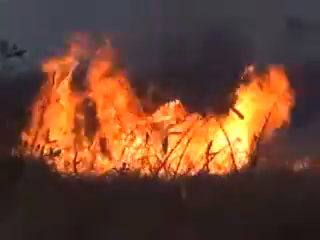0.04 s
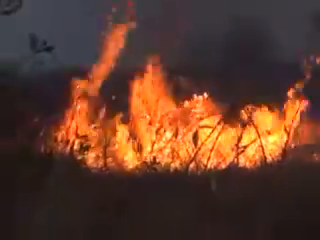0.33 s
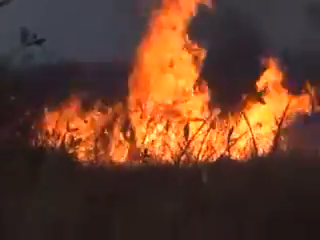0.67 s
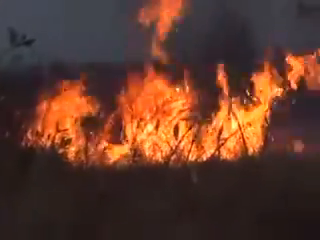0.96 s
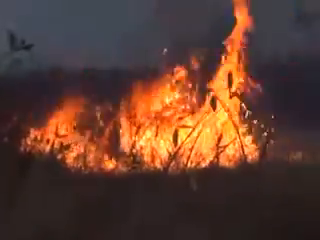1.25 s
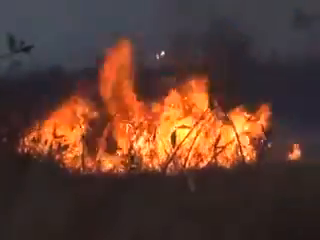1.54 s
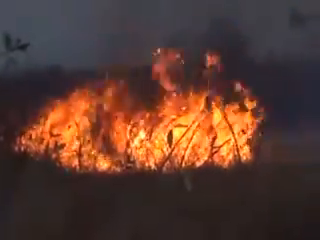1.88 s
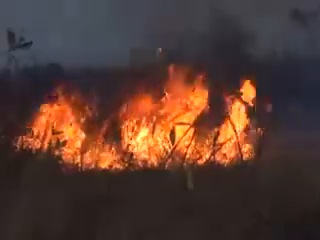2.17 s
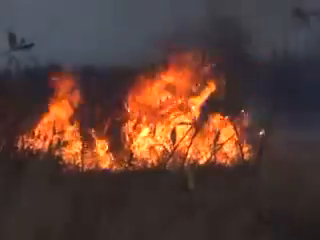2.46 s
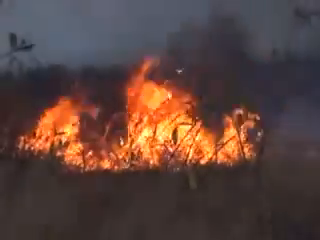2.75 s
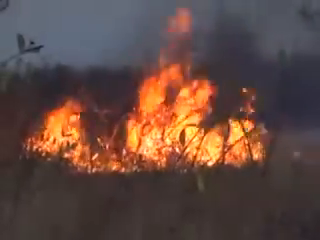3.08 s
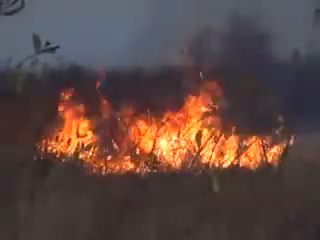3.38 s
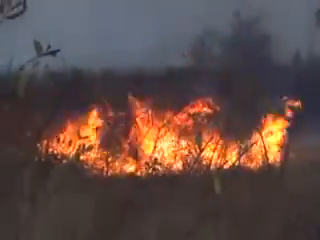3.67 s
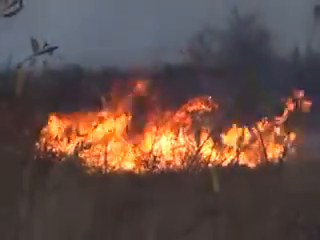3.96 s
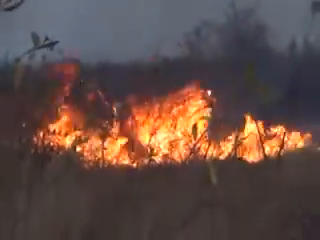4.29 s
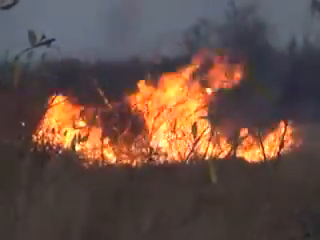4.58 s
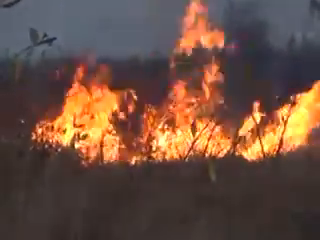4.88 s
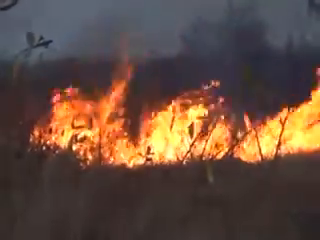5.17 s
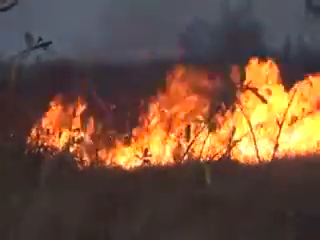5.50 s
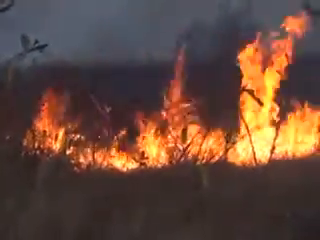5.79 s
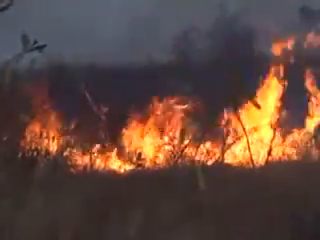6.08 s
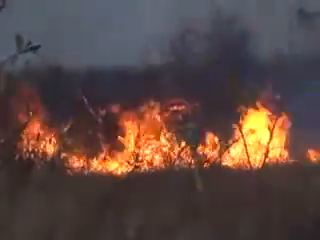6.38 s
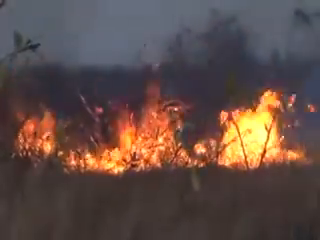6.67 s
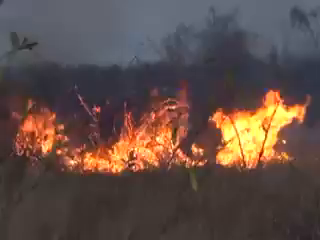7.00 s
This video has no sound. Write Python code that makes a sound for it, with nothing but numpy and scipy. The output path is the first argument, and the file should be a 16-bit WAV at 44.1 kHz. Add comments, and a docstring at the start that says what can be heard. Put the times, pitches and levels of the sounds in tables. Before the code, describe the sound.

Dry grass burns with a dense, bright crackle and sharp snaps over a low, fluttering roar of flames.

```python
"""A grass fire burns through dry brush in an open field, a few metres away and a little to the left.
Each bursting stalk radiates a pressure impulse and a decaying spray of noise from its tearing fibres.
Thousands superpose into a bright crackle; near ones snap, thick ones pop dully, hollow ones resonate.
Beneath them turbulent flames flutter and flare into a low, lumpy roar, and gas pockets ignite in whumps.
With no walls to reflect the sound, there is no reverberation."""
import sys
import numpy as np
from scipy import signal
from scipy.fft import rfft, irfft, next_fast_len
from scipy.io import wavfile
from scipy.ndimage import uniform_filter1d

SR = 44100
rng = np.random.default_rng(int(sys.argv[2]) if len(sys.argv) > 2 else 0)


def dump_mix(stems):
    """Bounce the given channels to the path in sys.argv[1] as a 16-bit WAV at rate SR."""
    frames = np.atleast_2d(stems).T  # one column per channel
    limited = np.clip(frames, -1, 1)  # hard clip at full scale
    pcm = np.round(limited * 32767).astype(np.int16)
    wavfile.write(sys.argv[1], SR, pcm)


N = 314874

# how hard the grass burns, used relative to its mean: t/s, thick-stalk level/dB, fine-blade level/dB
BURN_LEVELS = [(0.0, -37, -33), (1.31, -36, -34.5), (1.43, -37.5, -35), (1.87, -37, -35),
               (2.24, -37, -34.5), (2.42, -38, -36), (2.82, -37, -36), (3.42, -36.5, -33.5),
               (3.84, -38, -35.5), (4.2, -36, -34), (4.63, -36.5, -37), (4.81, -36, -36.5),
               (5.11, -36, -33), (5.47, -36, -32), (5.81, -36.5, -33), (6.04, -38, -34.5),
               (6.52, -38.5, -36.5), (7.14, -37.5, -36.5)]
# spectral envelope of ticks and snaps: f/Hz, gain/dB
SNAP_SPECTRUM = [(200, 21), (1000, -1), (2600, -0.5), (7000, -4), (10300, 0), (12500, -7), (15500, -22)]
STALK_HZ, BLADE_HZ = 2970, 8950   # where the two kinds of fuel sound
OPPOSITE = np.array([[1], [-1]])   # plus on the left, minus on the right


def from_db(db):
    """Amplitude ratio: a factor of ten for every 20 dB."""
    return 10 ** (np.asarray(db) / 20)


def unit_rms(x):
    """Normalisation to a mean square of one."""
    return x / np.sqrt(np.mean(x ** 2) + 1e-20)


def in_time(rows):
    """Linear interpolation of each column to every sample."""
    times, *columns = np.transpose(rows)
    return [np.interp(np.arange(N) / SR, times, column) for column in columns]


def at_hz(points, hz):
    """Interpolation on a logarithmic frequency axis."""
    known_hz, values = np.transpose(points)
    return np.interp(np.log(hz + 1e-9), np.log(known_hz), values)


def drift(corner_hz, step=40):
    """Random modulation of unit RMS: noise through two one-pole low-passes."""
    pole = np.exp(-2 * np.pi * corner_hz * step / SR)
    noise = rng.standard_normal(N // step + 2002)
    slow = signal.lfilter([1], [1, -2 * pole, pole ** 2], noise)[2000:]   # once settled
    return np.interp(np.arange(N) / step, np.arange(len(slow)), unit_rms(slow))


def coloured(x, spectrum, depth=1):
    """Minimum-phase filtering is causal: nothing sounds before its excitation."""
    size = 2 * next_fast_len(N // 2 + SR // 10)
    gain = from_db(depth * at_hz(spectrum, np.fft.rfftfreq(size, 1 / SR)))
    cepstrum = irfft(np.log(gain))
    cepstrum[1:size // 2] *= 2
    cepstrum[size // 2 + 1:] = 0
    return irfft(rfft(x, size) * np.exp(rfft(cepstrum)))[..., :N]


def resonance(x, hz, octaves, order=2):
    """A damped resonance as a band-pass: the wider the band, the shorter the ring."""
    low, high = hz * 2 ** (-octaves / 2), hz * 2 ** (octaves / 2)
    edges = [min(low, .4 * SR), min(high, .47 * SR)]
    return signal.sosfilt(signal.butter(order, edges, "band", fs=SR, output="sos"), x + 1e-18)


def stereo_noise(correlation, size=N):
    """Partial coherence: white noise with an in-phase and an antiphase part."""
    mid, side = rng.standard_normal((2, size))
    return np.sqrt((1 + correlation) / 2) * mid + np.sqrt((1 - correlation) / 2) * side * OPPOSITE


def tuft_swell_db(hz, spread_octaves=1.56):
    """A catching tuft raises the crackle's level by a Gaussian in time and log frequency."""
    # tufts catching: peak t/s, half-length/s, rise/dB, f/Hz
    tufts = [(0.708, 0.039, 2.5, 9000), (1.275, 0.032, 4, 5000), (1.893, 0.035, 3, 4000),
             (2.118, 0.046, 3, 6000), (3.277, 0.033, 2, 3000), (3.61, 0.021, 2, 2500),
             (3.953, 0.019, 7, 1600), (4.027, 0.017, 4.5, 7000), (4.254, 0.09, 3, 1630),
             (6.55, 0.02, 5, 3500)]
    t = np.arange(0, N, 200) / SR
    swell = sum(rise_db * np.exp(-((t - s) / half_s) ** 2 - (np.log2(hz / tuft_hz) / spread_octaves) ** 2)
                for s, half_s, rise_db, tuft_hz in tufts)
    return np.interp(np.arange(N) / SR, t, swell)


def crackle(level_db=-31.5, spray_share=0.7, spray_s=0.0011, hiss_db=-15, bands=16):
    """Shot noise: thousands of tiny bursts a second, most faint and a few strong, arrive in flurries."""
    # spectral envelope of the crackle: f/Hz, gain/dB
    spectrum = [(200, -3), (450, -7.5), (780, -10), (1000, -8.5), (1800, -4.5), (2700, -1.34),
                (3700, -0.65), (5200, -2), (7100, -2.5), (10300, -2.5), (12200, -8), (14300, -16),
                (15500, -27)]
    # coherence of sound scattered by the grass: f/Hz, left-right correlation
    coherence = [(600, 0.62), (1300, 1), (3000, 0.41), (7000, 0.42), (13000, 0.93)]
    stalks_db, blades_db = (db - db.mean() for db in in_time(BURN_LEVELS))
    flurry_db = drift(32)
    decay = np.exp(-1 / (spray_s * SR))
    out = np.zeros((2, N))
    for hz in np.geomspace(450, 15000, bands):
        # fine blades, which tick higher, outnumber thick stalks
        per_s = 5200 / bands * (hz / 5200) ** 0.4 * from_db(flurry_db + 1.95 * drift(35))
        arrivals = rng.random(N) < per_s / SR
        sizes_db = 5 * np.minimum(rng.exponential(1, N), 3.44)
        spikes = unit_rms(arrivals * from_db(sizes_db))
        # fibres tear just after each spike; the far part of the fire merges into a hiss
        tearing = signal.lfilter([1 - decay], [1, -decay], spikes ** 2 + 1e-18)
        spray = np.sqrt(spray_share * tearing + from_db(hiss_db) ** 2) * stereo_noise(at_hz(coherence, hz))
        grains = np.sqrt(1 - spray_share) * spikes + spray
        narrowing = min(1, STALK_HZ / hz) ** 0.27   # the finest blades tick in a narrower band
        band = resonance(grains, hz, octaves=1.4 * narrowing) / np.sqrt(narrowing)
        blade_share = at_hz([(STALK_HZ, 0), (BLADE_HZ, 1)], hz)
        burn_db = (1 - blade_share) * stalks_db + blade_share * blades_db
        out += band * from_db(burn_db + tuft_swell_db(hz))
    return from_db(level_db) * unit_rms(coloured(out, spectrum))


def turbulence(swirl_db, swirl_hz, octaves):
    """Large eddies reach both sides coherently; smaller swirls add a band in antiphase."""
    shared, apart = rng.standard_normal((2, N))
    return shared + from_db(swirl_db) * resonance(apart, swirl_hz, octaves) * OPPOSITE


def flame_strength(attack_s=0.029, release_s=0.035):
    """Incoherent sources add in power: the draught, and flares that rise, hold and die away."""
    # steady draught of the flame front: t/s, level/dB
    draught = [(0, -42), (.45, -51), (.8, -45.5), (1.7, -41), (2.3, -39), (3.1, -46), (4.3, -46),
               (5.6, -45), (6.2, -49.5), (7.14, -51.5)]
    # tongues of flame flaring up: t/s, hold/s, level/dB
    flares = [(0, 0.24, -31), (0.767, 0.1, -39.5), (2.54, 0.094, -35), (2.625, 0.11, -34),
              (2.75, 0.08, -35), (2.934, 0.041, -36), (3.253, 0.15, -40.5), (3.625, 0.054, -38),
              (4.46, 0.036, -37), (4.59, 0.11, -37), (4.76, 0.015, -37), (4.85, 0.046, -36),
              (5.152, 0.049, -38.5), (5.275, 0.12, -36.5), (5.487, 0.037, -31), (5.59, 0.02, -33.5)]
    t = np.arange(N) / SR
    power = from_db(in_time(draught)[0]) ** 2
    for s, hold_s, level_db in flares:
        rise = np.clip(1 + (t - s) / attack_s, 0, 1)
        fall = np.exp(-np.maximum(t - s - hold_s, 0) / release_s)
        power += (from_db(level_db) * rise * fall) ** 2
    return np.sqrt(power)


def roar(gain_db=0.74, lumpy_db=3.5, average_s=0.05):
    """Turbulent combustion radiates low noise in quick lumps; its running RMS follows the flames."""
    # spectral envelope of the roar: f/Hz, gain/dB
    spectrum = [(12, -48), (25, -13), (50, -0.5), (90, -0.5), (135, -0.5), (200, -6.5), (280, -13.5),
                (420, -19.5), (900, -33.5), (2000, -58)]
    eddies = turbulence(swirl_db=-7.5, swirl_hz=176, octaves=3.8) * from_db(lumpy_db * drift(34))
    rumble = coloured(eddies, spectrum)
    running_power = uniform_filter1d(np.mean(rumble ** 2, axis=0), int(average_s * SR))
    return from_db(gain_db) * flame_strength() * rumble / np.sqrt(running_power + 1e-18)


def flutter(level_db=-43.5, lumpy_db=4.0):
    """Amplitude-modulated turbulence: small flames flap along the ground without pause."""
    # spectral envelope of the small flames: f/Hz, gain/dB
    spectrum = [(30, -4.5), (120, 4.5), (300, -0.5), (430, -1), (620, -9.5), (800, -6), (1100, -19),
                (2500, -21)]
    eddies = turbulence(swirl_db=-29, swirl_hz=215, octaves=0.84)
    flapping = from_db(lumpy_db * np.minimum(drift(44), 1.6))   # capped, so it never thuds
    return from_db(level_db) * unit_rms(coloured(eddies * flapping, spectrum))


def burst(level_db, hz, octaves, spray_share, spray_s, correlation, ring=0.0, size=1024):
    """Impulse excitation: a splitting stalk's spike and spray of tearing fibres drive its resonance."""
    t = np.arange(size) / SR
    spray = stereo_noise(correlation, size) * np.exp(-t / spray_s)
    push = np.sqrt(spray_share / size) * unit_rms(spray)
    push[:, 0] += np.sqrt(1 - spray_share)
    sound = resonance(push, hz, octaves) + ring * resonance(push, hz, octaves=0.21, order=1)
    return from_db(level_db) * np.sqrt(0.003 * SR / size) * unit_rms(sound)   # energy of 3 ms at level_db


def add(out, s, sound):
    """Superposition of a short sound starting at time s."""
    start = int(np.clip(round(s * SR), 0, N - 1))
    out[:, start:start + sound.shape[1]] += sound[:, :N - start]


def ticks(per_s=50):
    """A Poisson process: single stalks a little farther off tick more often as the grass burns harder."""
    out = np.zeros((2, N))
    burn_db = np.mean(in_time(BURN_LEVELS), axis=0)
    chance = per_s / SR * from_db(burn_db - burn_db.mean())
    times = np.flatnonzero(rng.random(N) < chance) / SR
    for s, (softness, pitch, width, side) in zip(times, rng.uniform(-0.56, 1, (len(times), 4))):
        tick = burst(level_db=-32.5 - 0.5 * softness, hz=4600 * 2 ** (1.22 * pitch),
                     octaves=2.08 * 2 ** width, spray_share=0.14, spray_s=0.00095, correlation=1)
        add(out, s, tick * from_db(4.9 * side * OPPOSITE))
    return coloured(out, SNAP_SPECTRUM)


def whumps(half_width_cycles=0.38, max_shift_s=0.001):
    """A monopole pulse: a gas pocket expands and collapses, giving one compression and one rarefaction."""
    # pockets of gas igniting: centre t/s, envelope level/dB, f/Hz
    pockets = [(0.0243, -16, 162), (0.086, -14, 131), (0.094, -10, 158), (0.215, -13.5, 170),
               (2.549, -27, 119), (2.649, -19.5, 124), (2.688, -18, 164), (2.7128, -17, 145),
               (2.7668, -17, 121), (4.477, -16.5, 142), (4.642, -16.5, 117), (4.906, -22, 138),
               (5.15, -20.5, 144), (5.1725, -22.5, 120), (5.281, -22, 135), (5.3362, -16.5, 127),
               (5.394, -16, 140), (5.51, -18, 160), (5.525, -22, 150), (5.532, -30, 140), (5.539, -17, 140)]
    out = np.zeros((2, N))
    t = np.arange(-SR // 50, SR // 50) / SR
    for (s, level_db, hz), side in zip(pockets, rng.uniform(-1, 1, len(pockets))):
        cycles = hz * (t + max_shift_s * side * OPPOSITE)   # reaches one side sooner
        envelope = from_db(level_db) * np.exp(-(cycles / half_width_cycles) ** 2)
        add(out, s + t[0], -envelope * np.sin(2 * np.pi * cycles))
    return out


def snaps(gain_db=1.38, hollow_hz=3500):
    """Brittle fracture: the nearest stalks crack loudly; the low, hollow ones resonate most."""
    # nearest stalks bursting: t/s, relative level/dB, f/Hz, bandwidth/octaves
    stalks = [(.0262, -19.5, 5400, 3.2), (0.0373, -17, 5360, 0.56), (.0685, -24, 6500, 2.4),
              (.073, -21, 7000, 2), (0.128, -19.5, 5800, 3.5), (.2218, -25, 3100, 2.2),
              (.2531, -28, 4400, 1.6), (0.2856, -26.5, 2170, 4.1), (0.3882, -15.5, 6800, 1.3),
              (.4003, -18, 4020, 1.7), (0.4185, -23, 5800, 1.8), (0.4508, -19, 5300, 1.6),
              (.5811, -25, 5000, 1.1), (.616, -21.5, 7600, 1.1), (.6358, -27, 3600, 2),
              (.6462, -25.5, 7300, 1.6), (0.694, -23, 7400, 0.91), (.7153, -20, 11800, .44),
              (0.7334, -19.5, 6000, 2.2), (0.8302, -24, 4000, 2.8), (.8511, -25, 4000, 3.7),
              (0.857, -20, 9500, 1.9), (.9063, -29, 3200, 1.6), (0.9746, -16.5, 5600, 2.8),
              (.9905, -24, 3200, 1.2), (1.015, -24, 4900, 2.2), (1.0796, -24, 6500, 1.7),
              (1.089, -28, 2800, 0.58), (1.1244, -23, 5800, 1.9), (1.1303, -18, 4830, 1.9),
              (1.2444, -29, 9800, 1.3), (1.2721, -25.5, 5500, 3.4), (1.3432, -24, 7200, 1.5),
              (1.3488, -20.5, 4560, 2.1), (1.363, -17, 7500, 2), (1.4356, -18.5, 8400, 0.89),
              (1.4724, -19, 8000, 4.9), (1.475, -13.5, 10000, 2), (1.5163, -27, 3220, 2.8),
              (1.5627, -24, 8600, .9), (1.6526, -17.5, 6600, 1.5), (1.671, -22, 5200, 2.6),
              (1.6941, -19.5, 3800, 3.1), (1.7151, -25.5, 2800, 1), (1.8543, -22.5, 4800, 0.61),
              (1.9126, -30, 3300, 1.6), (2.0452, -23, 10800, 0.37), (2.0945, -33, 5200, 2),
              (2.229, -23, 10100, 0.76), (2.3446, -21, 7300, 2.7), (2.3571, -20, 2220, 3.4),
              (2.376, -19, 7560, 1.4), (2.3884, -23, 3600, 3.2), (2.4935, -23, 9000, 1.8),
              (2.6273, -24, 2260, 3.6), (2.6738, -23, 7500, 2.3), (2.774, -22, 4100, 2.3),
              (2.9176, -20.5, 7600, 1.8), (2.9263, -20.5, 9000, 3.6), (3.003, -22.5, 3900, 1.9),
              (3.0748, -26, 7000, 1.5), (3.1891, -20.5, 4960, 1.8), (3.1978, -32.5, 2500, 1.2),
              (3.2119, -29, 2900, 1), (3.2765, -24, 2700, 0.79), (3.2962, -26, 3800, 1.2),
              (3.3867, -26.5, 4800, 0.99), (3.4807, -28, 5000, 1.1), (3.5411, -24.5, 2700, 1.9),
              (3.5456, -22.5, 2150, 1.3), (3.6133, -25.5, 2680, 1.4), (3.629, -27, 3300, 1.1),
              (3.636, -25, 3930, .8), (3.717, -25.5, 3700, 2), (3.7545, -24, 4150, 2.7),
              (3.7948, -19.5, 6430, 1.8), (3.979, -29.5, 2500, 1.8), (4.0217, -21, 5600, 4.5),
              (4.1015, -30, 8500, 1), (4.4619, -28.5, 3700, 2), (4.5474, -28.5, 1900, 0.85),
              (4.5699, -21.5, 4600, 1), (4.6133, -26, 9500, 1), (4.6337, -23, 11800, 1.7),
              (4.831, -23, 3400, 1.8), (4.8879, -16, 4530, 2.3), (4.9216, -33, 2720, 1),
              (5.0255, -21.5, 4380, 1), (5.051, -21.5, 5600, 2), (5.088, -31, 3300, 1.2),
              (5.1085, -20, 4600, 1.8), (5.1363, -24, 4000, 1.6), (5.2125, -27, 4600, 2.2),
              (5.2242, -25, 6200, 2), (5.2389, -21, 4120, 2.4), (5.3128, -13.5, 8000, 2.4),
              (5.3601, -22.5, 3450, 1), (5.3755, -21, 4500, 1.6), (5.41, -19, 10200, 1.1),
              (5.4165, -21.5, 3700, 3.8), (5.5039, -23.5, 4800, 1.5), (5.526, -12.5, 5200, 1.54),
              (5.6025, -22, 8000, 2.5), (5.6108, -17, 7500, 4.4), (5.6206, -19, 8800, 0.99),
              (5.661, -16, 6700, 3.5), (5.6721, -19, 3600, 1), (5.6785, -16, 7600, 2.1),
              (5.7453, -21.5, 3200, 2.4), (5.8235, -21, 4840, 0.91), (5.8509, -23, 9600, 1.6),
              (5.8641, -37, 3500, 2), (5.8817, -34, 6500, 1.2), (5.922, -20, 7200, 1.4),
              (5.9566, -23.5, 4120, 1.6), (6.1572, -29, 3000, 1), (6.2786, -26, 9000, 1.5),
              (6.3328, -18.5, 11000, 1.6), (6.4577, -25, 3900, 1.5), (6.5358, -18, 4770, 3.5),
              (6.5548, -18, 5100, 1.1), (6.7258, -25.5, 5940, 0.64), (6.7973, -19, 9000, 1.8),
              (6.806, -21, 6100, 5), (6.8613, -23, 2830, 1.7), (6.8891, -25, 7200, 1),
              (6.8996, -19.5, 7600, 2.4), (6.9041, -25, 4000, 1.8), (6.9601, -27, 2490, 1.7),
              (7.014, -24.5, 8200, 0.81)]
    out = np.zeros((2, N))
    for s, level_db, hz, octaves in stalks:
        ring = 0.53 * min(1, (hollow_hz / hz) ** 2)
        add(out, s, burst(level_db + gain_db, hz, octaves,
                          spray_share=0.23, spray_s=0.0022, correlation=0.83, ring=ring))
    return coloured(out, SNAP_SPECTRUM)


def pops(gain_db=0.7):
    """Thick stems burst more slowly and resonate lower; heavy damping makes the lowest a broad knock."""
    # thick stems bursting: t/s, relative level/dB, f/Hz
    stems = [(.341, -32, 820), (.991, -32, 900), (1.323, -35, 1010), (1.797, -32, 860), (2.316, -35, 1020),
             (2.358, -46, 380), (2.616, -33, 1190), (2.625, -48, 530), (2.902, -29.5, 1900),
             (3.081, -33, 1000), (3.7085, -31.5, 1350), (3.941, -30.5, 1700), (4.133, -34.5, 1390),
             (4.184, -31, 1700), (4.196, -26, 365), (4.269, -29, 1480), (4.466, -29.5, 1500),
             (4.829, -32.5, 940), (4.966, -28, 1730), (5.744, -52, 1360), (5.864, -32, 2100),
             (6.306, -30, 383)]
    out = np.zeros((2, N))
    for s, level_db, hz in stems:
        octaves = 1.5 * max(1, STALK_HZ / 3 / hz) ** 0.34
        add(out, s, burst(level_db + gain_db, hz, octaves,
                          spray_share=0.42, spray_s=0.0029, correlation=0.87, ring=0.53))
    return out


def hollow_stems(decay_s=0.0016):
    """Cavity resonance: the air in a bursting hollow stem rings for a few cycles at a woody pitch."""
    # air columns ringing: t/s, initial level/dB, f/Hz
    cavities = [(0.3998, -24, 3140), (.7334, -19, 3800), (.9746, -15, 2740), (1.6935, -21, 3790),
                (1.8543, -18.5, 5050), (2.3583, -25, 2120)]
    out = np.zeros((2, N))
    t = np.arange(1024)[None] / SR
    for s, level_db, hz in cavities:
        add(out, s, from_db(level_db) * np.sin(2 * np.pi * hz * t) * np.exp(-t / decay_s))
    return out


def scene():
    """All sources superpose; an interaural level difference sets the fire slightly to the left."""
    # level difference between the sides: f/Hz, left minus right/dB
    lean = [(100, -0.5), (350, 1), (700, 1), (1300, 2.5), (2400, 4), (4400, 2.5), (8000, 2), (14000, -0.5)]
    left, right = crackle() + ticks() + snaps() + hollow_stems() + pops() + roar() + flutter() + whumps()
    return np.array([coloured(left, lean, depth=0.5), coloured(right, lean, depth=-0.5)])


def record(dry, ceiling=0.68, cutoff_hz=15700):
    """Soft saturation rounds the tallest spikes; a steep low-pass limits the bandwidth."""
    low_pass = signal.ellip(10, .1, 90, cutoff_hz, fs=SR, output="sos")
    return signal.sosfilt(low_pass, ceiling * np.tanh(dry / ceiling))


dry = scene()
out = record(dry)
dump_mix(out)
```